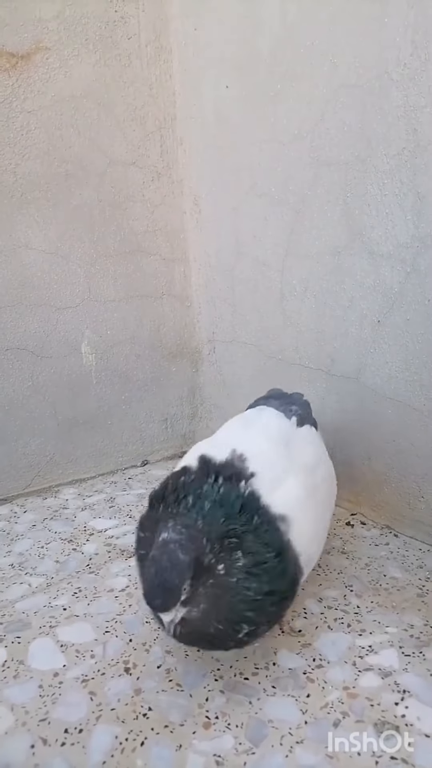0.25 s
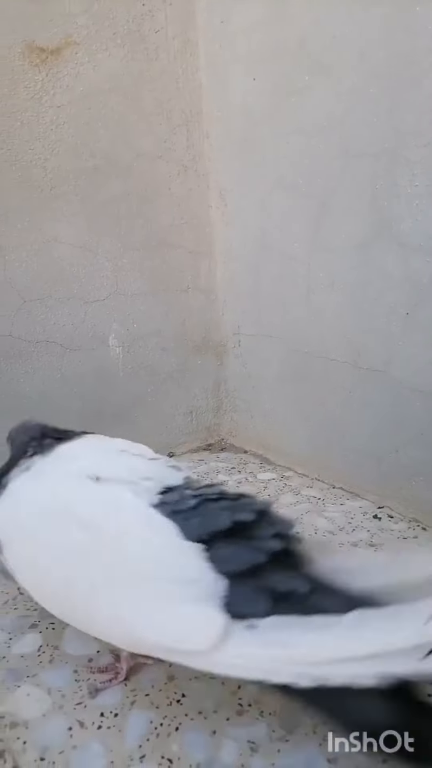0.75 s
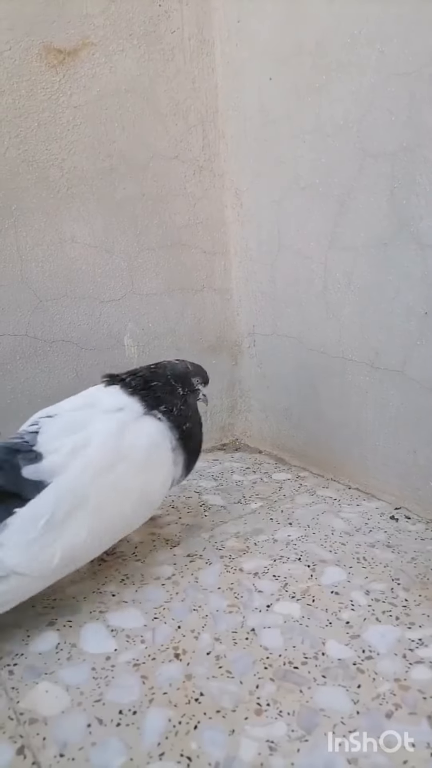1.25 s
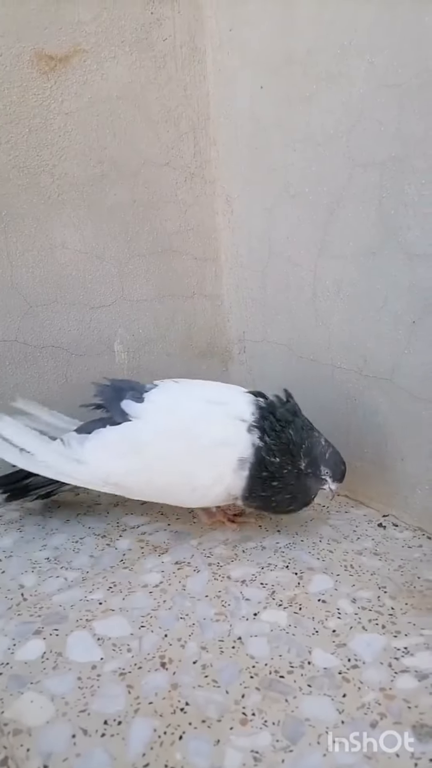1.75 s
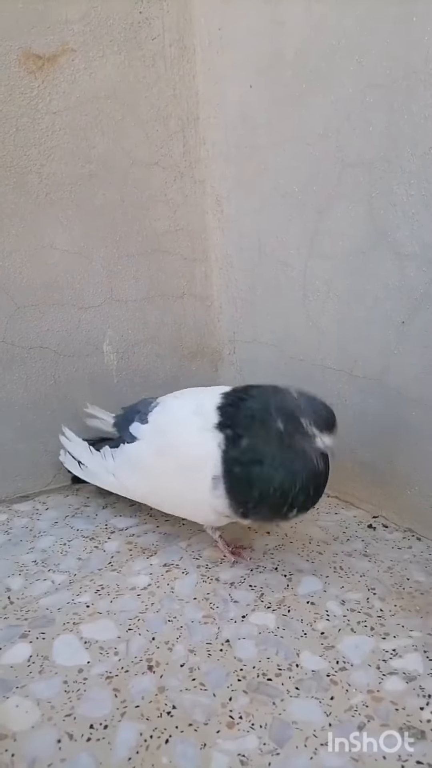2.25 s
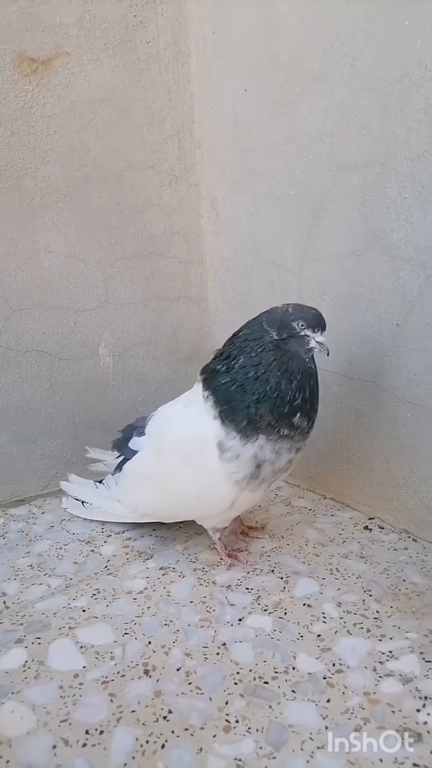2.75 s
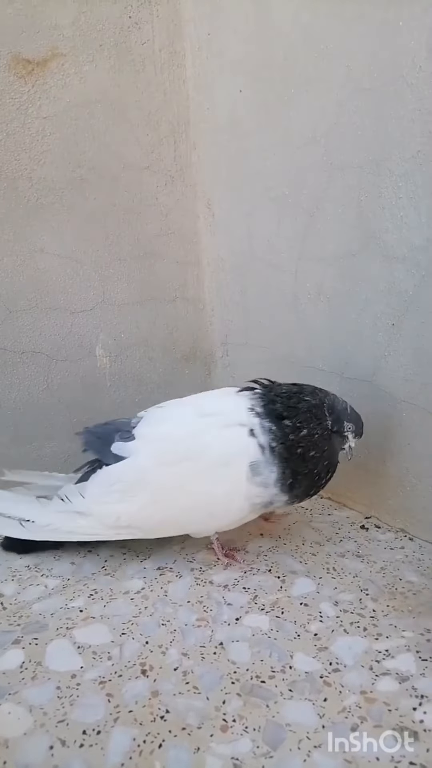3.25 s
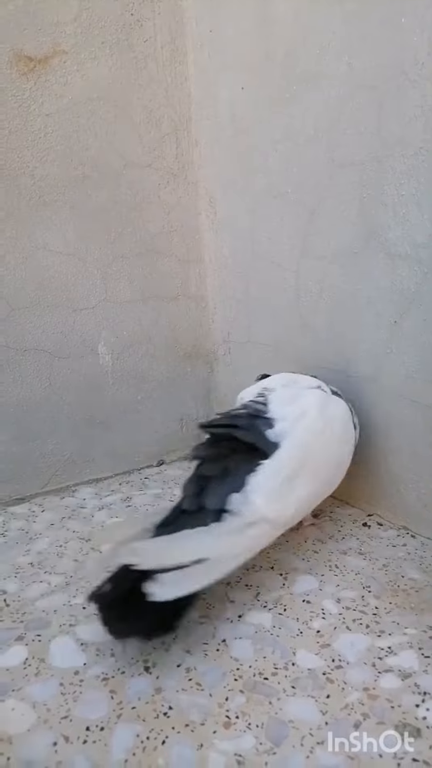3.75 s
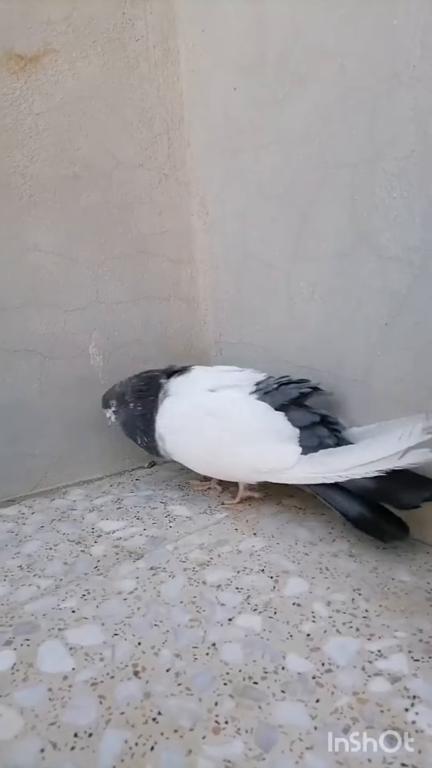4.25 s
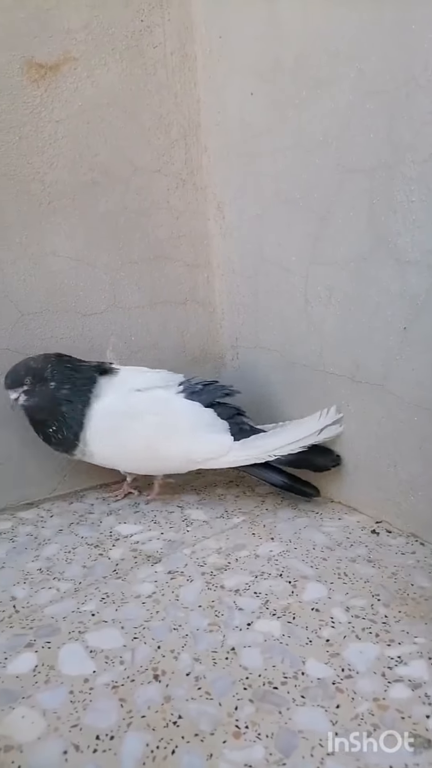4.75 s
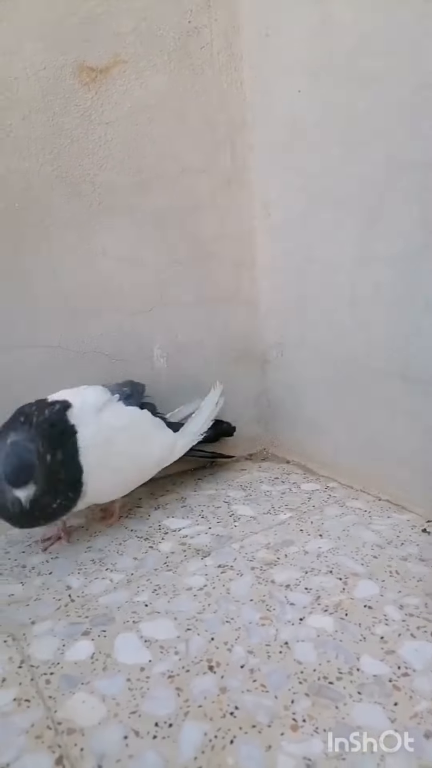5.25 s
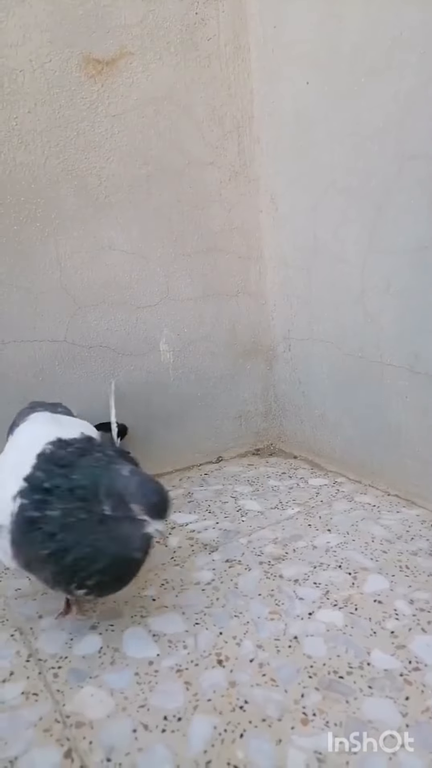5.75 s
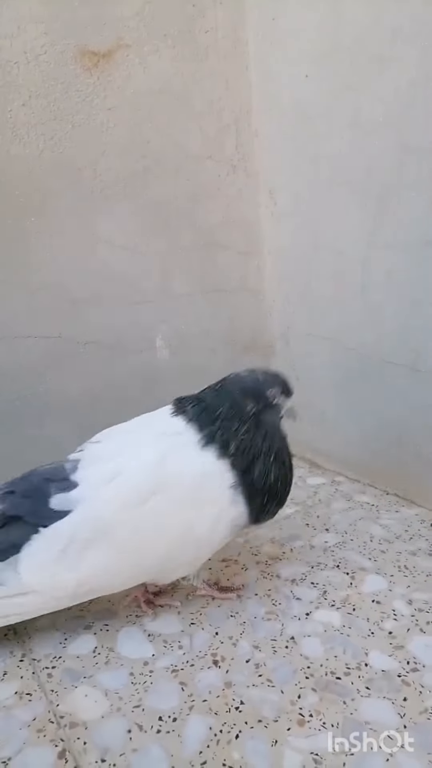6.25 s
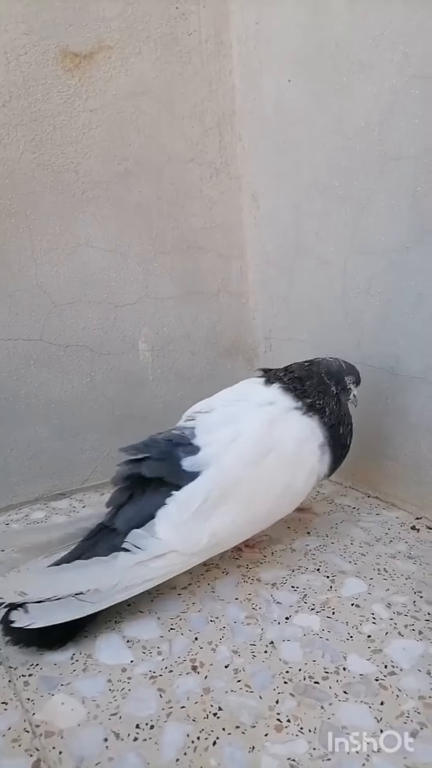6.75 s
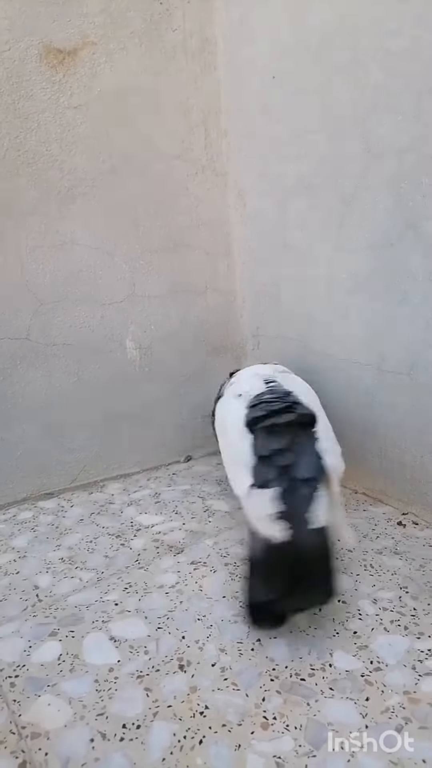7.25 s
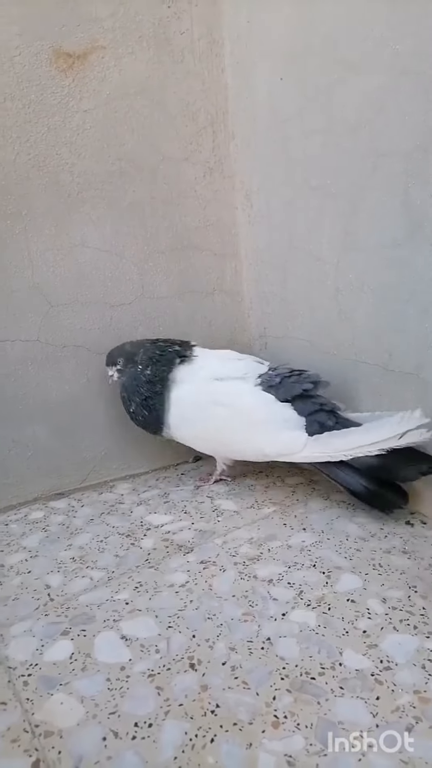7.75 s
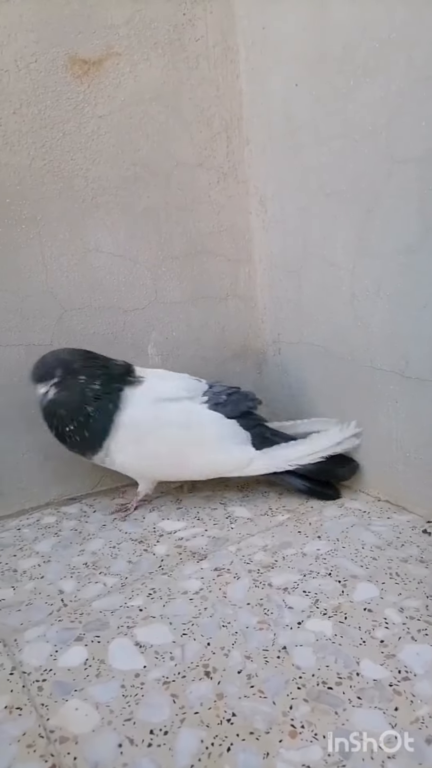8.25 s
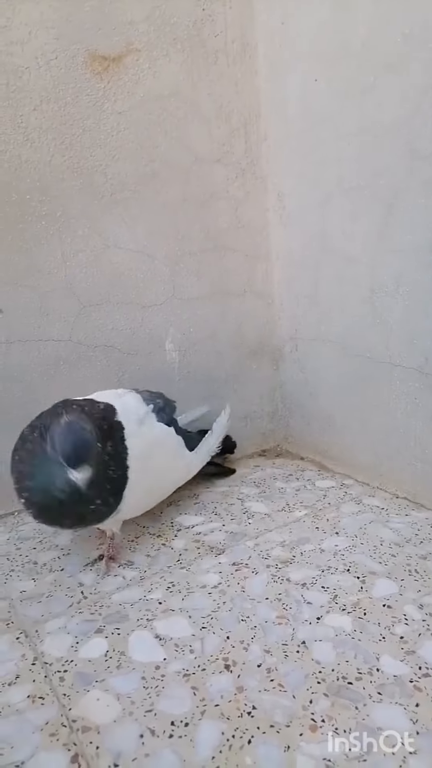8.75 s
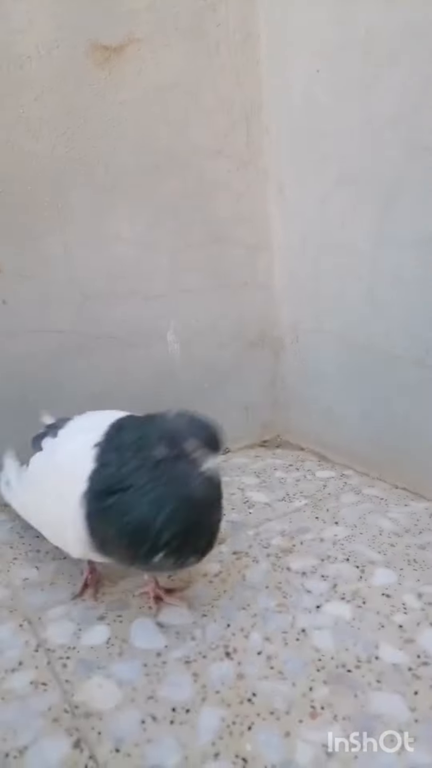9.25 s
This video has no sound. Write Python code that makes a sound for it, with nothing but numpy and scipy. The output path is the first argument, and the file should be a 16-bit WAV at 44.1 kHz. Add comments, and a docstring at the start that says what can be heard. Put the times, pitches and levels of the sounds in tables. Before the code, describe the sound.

A nearby pigeon gives low, stuttering, throaty coos and taps about on stone, with faint distant birds and a soft hiss.

```python
"""A pigeon coos and struts close by, on a stone floor in the corner of a room.
Pulses from its syrinx ring the inflated crop and the beak: coos stutter in short bursts over a soft hum
or glide, hold a rough growl, and may trail off in a low creak. Feet tap among papery brushes, and small
birds whistle far off. Airy hiss swells over low buffeting around the second coo, a brighter hiss lies
under the last two, and everything stops abruptly."""
import sys
import numpy as np
from scipy import signal
from scipy.fft import rfft, irfft
from scipy.io import wavfile
from scipy.ndimage import uniform_filter1d, minimum_filter1d

SR = 44100
rng = np.random.default_rng(int(sys.argv[2]) if len(sys.argv) > 2 else 0)


def int16_out(signal):
    """Quantize to a 16-bit WAV file."""
    q = np.round(np.clip(np.atleast_2d(signal).T, -1, 1) * 32767)
    wavfile.write(sys.argv[1], SR, q.astype(np.int16))


N = 418950
TIME = np.arange(N) / SR
OPEN_FROM_HZ = 480   # the beak counts as open from this resonance up


def pigeon():
    """The whole voice: growls, creaks, hums, one glide and stuttering bursts."""
    return growls() + creaks() + hums() + glide() + bursts()


# The growl that crowns each coo. Each row: start, hold and release in seconds, level in dB,
# pitch in Hz, beak resonance in Hz, roll depth 0-1, roughness 0-1.
GROWLS = [(0, 0.17, 0.27, -7.5, 183.6, 352, 0.2, 0.66), (2.181, .24, 0.12, -18.5, 188.5, 473, 0.45, .9),
          (7.089, .24, 0.0115, -18.5, 194.8, 550, 0.82, 0.61),
          (8.048, 0.24, 0.019, -20.5, 186.5, 552, 0.87, 0.5)]
def growls(roll_period_s=.091, first_crest_s=.018, sag_hz_per_s=20):
    """Sagging, throaty notes pushed out in rolls; each crest is higher, rougher and opens the beak."""
    out = np.zeros(N)
    for start, hold_s, release_s, db, hz, beak_hz, depth, rough in GROWLS:
        t, envelope = hold_and_release(hold_s, release_s)
        roll = depth * np.cos(2 * np.pi * (t - first_crest_s) / roll_period_s)
        pitch = (hz - sag_hz_per_s * t) * (1 + .065 * roll)
        gape = np.maximum(roll, 0) * np.sqrt(t / t[-1])
        lowest_hz = 225 if beak_hz < OPEN_FROM_HZ else hz   # a shut beak holds back the fundamental
        add(out, start, syrinx(pitch, from_db(db) * envelope, beak_hz, rough * (1 + .5 * roll),
                               soft_hz=900, lowest_hz=lowest_hz, gape=gape))
    return out


# Low creaks around the coos. Each row: start, hold and release in seconds, level in dB,
# first and last pitch in Hz, beak resonance in Hz.
CREAKS = [(1.318, 0.11, 0.042, -31, 96.3, 152.6, 435), (7.336, 0.065, 0.11, -33, 121.2, 126.2, 680),
          (8.285, 0.121, 0.08, -30.5, 103.1, 111.7, 755)]
def creaks():
    """A slack syrinx pulses slowly and roughly."""
    return held_notes(CREAKS, rough=.66, soft_hz=2500)


# Soft hums within the coos. Each row: start, hold and release in seconds, level in dB,
# first and last pitch in Hz, beak resonance in Hz.
HUMS = [(0, 0.32, 0.13, -22, 231.5, 200, 383), (1.436, 0.1, 0.013, -34, 161.5, 211, 390),
        (1.662, 0.12, 0.043, -28, 180.6, 200, 400), (2.167, 0.27, 0.023, -22.5, 246.6, 266.8, 440),
        (2.85, 0.032, 0.19, -37.5, 197.6, 172, 307), (6.91, 0.074, 0.012, -28, 260.7, 316, 590),
        (6.996, 0.083, 0.0088, -28, 201, 184, 604)]
def hums():
    """The other side of the syrinx closes gently, so the fundamental leads."""
    return held_notes(HUMS, rough=.6, soft_hz=197)


# The arch of the second coo. Each row: time in seconds, pitch in Hz, relative level in dB.
GLIDE = [(1.8, 260, -18), (1.817, 340, -15), (1.838, 409.4, -12), (1.856, 464.6, -24), (1.936, 582.4, -29),
         (1.977, 488, -28.5), (2.049, 480, -27.5), (2.137, 354, -12), (2.176, 250, -23.5)]
def glide(gain_db=1, fade_s=.006):
    """A nearly pure note that arches up and back down."""
    out = np.zeros(N)
    t = np.arange(GLIDE[0][0], GLIDE[-1][0], 1 / SR)
    pitch, level_db = curves_at(GLIDE, t)
    fade = np.clip(np.minimum(t - t[0], t[-1] - t) / fade_s, 0, 1)
    add(out, t[0], syrinx(pitch, from_db(level_db + gain_db) * fade, beak_hz=435, rough=.045))
    return out


# Throat bursts; the shortest are one-pulse clucks. Each row: start in seconds, peak in dB,
# length in seconds, beak resonance in Hz.
BURSTS = [(1.333, -20.5, .001, 664), (1.55, -13, 0.014, 453), (1.613, -12, 0.00079, 623),
          (1.712, -11, 0.015, 418), (1.779, -7.5, 0.02, 450), (1.867, -0.5, 0.0062, 430),
          (1.957, 3, 0.025, 450), (1.987, -10.5, 0.014, 426), (6.571, -19.5, .003, 586),
          (6.668, -20.5, .001, 595), (6.715, -18.5, .001, 607), (6.752, -16.5, .001, 563),
          (6.798, -13.5, .008, 556), (6.848, -17, .001, 553), (6.867, -9, .011, 588),
          (6.964, -7.5, 0.01, 595), (7.079, -7.5, 0.008, 574), (7.226, -5, .001, 564),
          (7.327, -10.5, .001, 600), (7.385, -16.5, .016, 735), (7.527, -16.5, 0.0042, 534),
          (7.572, -15.5, 0.01, 690), (7.624, -14.5, .001, 546), (7.67, -11.5, 0.0057, 684),
          (7.706, -10, 0.0012, 640), (7.748, -10, 0.0081, 530), (7.805, -7, 0.015, 578),
          (7.847, -9, 0.002, 576), (7.898, -4.5, 0.015, 603), (7.99, -5.5, 0.018, 598),
          (8.305, -17.5, .001, 910), (8.396, -17, .001, 924)]
def bursts(rebound_gap_s=.011, rebound_db=-2.5):
    """The stutter of a coo: short bursts rebound once, weaker and half as long."""
    out = np.zeros(N)
    for start, db, length, beak_hz in BURSTS:
        add(out, start, burst(db, length, beak_hz))
        if .002 < length < .015:   # the briefest clucks and the long bursts do not rebound
            add(out, start + length + rebound_gap_s, burst(db + rebound_db, length / 2, beak_hz))
    return out


def burst(peak_db, length, beak_hz, shut_pitch_hz=355.6):
    """A few pulses ring the throat, near the crop's pitch or an octave under an open beak's ring."""
    pitch = shut_pitch_hz if beak_hz < OPEN_FROM_HZ else beak_hz / 2
    delays = np.arange(0, length, 1 / pitch)
    arch = np.sin(np.pi * (delays + .5 / pitch) / (length + .5 / pitch))
    pulses = np.zeros(SR // 10)
    pulses[(delays * SR).astype(int)] = np.abs(arch) ** .82
    voice = throat(pulses, beak_hz)
    return from_db(peak_db) * voice / np.abs(voice).max()


def held_notes(rows, rough, soft_hz):
    """Quiet held notes, each sliding evenly in pitch."""
    out = np.zeros(N)
    for start, hold_s, release_s, db, first_hz, last_hz, beak_hz in rows:
        t, envelope = hold_and_release(hold_s, release_s)
        pitch = np.linspace(first_hz, last_hz, len(t))
        add(out, start, syrinx(pitch, from_db(db) * envelope, beak_hz, rough, soft_hz, lowest_hz=111))
    return out


def syrinx(pitch, envelope, beak_hz, rough, soft_hz=3000, lowest_hz=185, gape=0, shimmer_db=2.5):
    """Membranes pulse once a cycle into the throat; roughness unsettles pitch, timing and strength."""
    n = len(pitch)
    pitch = pitch * (1 + .05 * rough * wobble(n, 25, "low"))
    onsets = np.flatnonzero(np.diff(np.floor(np.cumsum(pitch) / SR), prepend=-1))
    lateness, strength = rng.standard_normal((SR, 2))[:len(onsets)].T
    jitter = .06 * lateness * SR * (rough / pitch)[onsets]
    onsets = np.clip(onsets + jitter, 0, n - 1).astype(int)
    pulses = np.zeros(n)
    pulses[onsets] = from_db(shimmer_db * np.mean(rough) * strength)
    pulses = butter(pulses, soft_hz, "low", order=1)
    # a gaping beak rings higher
    voice = (1 - gape) * throat(pulses, beak_hz) + gape * throat(pulses, beak_hz * 1.2)
    voice /= np.sqrt(uniform_filter1d(voice ** 2, size=500) + 1e-14)   # even out the level
    throb = 1 + .5 * rough * wobble(n, (20, 65), "band")   # the membranes throb unevenly
    return butter(voice * envelope * rms_one(throb), lowest_hz, "high", order=5)


# The beak rings higher and stronger as it opens. Each row: resonance in Hz, dB against the crop's ring.
BEAK_STRENGTH = [(385, -20.5), (450, -11.5), (530, -1), (720, 4)]
def throat(pulses, beak_hz, leak_db=-24):
    """The inflated crop and the beak ring; the neck muffles nearly everything above them."""
    beak_db = np.interp(beak_hz, *np.transpose(BEAK_STRENGTH))
    crop = resonance(pulses, hz=327, width_hz=270)
    beak = from_db(beak_db) * resonance(pulses, beak_hz, width_hz=180)
    ring = butter(crop - beak, 200, "high", order=3)
    leak = from_db(leak_db + beak_db / 2) * butter(ring, 1200, "low")
    return butter(ring, beak_hz * 1.037, "low", order=10) + leak


# Footfalls. Each row: start in seconds, relative level in dB.
STEPS = [(0.5, -30), (0.981, -29), (2.841, -17), (3.877, -24), (3.997, -29), (4.32, -30.5), (5.369, -31),
         (5.802, -30.5), (6.118, -33), (6.159, -33), (6.396, -26)]
# Their hollow midrange. Each row: frequency in Hz, gain in dB.
STEP_COLOUR = [(100, -12.5), (330, -5.5), (560, -4), (800, -8.5), (9000, -35.5)]
def footsteps(gain_db=-7):
    """Feet knock softly on the stone."""
    knocks = sum(from_db(db + gain_db) * strike(start, .00029, decay_s=.032) for start, db in STEPS)
    return knocks * noise(STEP_COLOUR)


# Light scuffs. Each row: start in seconds, relative level in dB.
SCUFFS = [(3.562, -32), (4.43, -41), (5.037, -38.5), (5.279, -37), (7.338, -34.5), (7.435, -29),
          (7.484, -32.5), (7.53, -28), (7.637, -32), (8.291, -31)]
def scuffs():
    """Feet graze the floor in short, airy scrapes."""
    scrapes = sum(from_db(db) * strike(start, .004, decay_s=.015) for start, db in SCUFFS)
    return scrapes * noise(AIR_COLOUR)


# Claw ticks. Each row: start in seconds, relative level in dB.
CLAWS = [(0.0185, -15), (0.214, -31), (0.2384, -27), (6.6866, -21), (6.783, -21), (8.021, -21.5),
         (8.055, -19), (8.118, -20.5), (8.151, -19)]
# Their bright edge. Each row: frequency in Hz, gain in dB.
CLAW_COLOUR = [(2000, -22), (5500, -14.5), (14000, -21)]
def claws(gain_db=-8):
    """Claws click sharply on the stone."""
    ticks = sum(from_db(db + gain_db) * strike(start, .0003, decay_s=.004) for start, db in CLAWS)
    return ticks * noise(CLAW_COLOUR)


# Papery brushes, then two clicks. Each row: start in seconds, relative level in dB, decay in seconds.
BRUSHES = [(1.548, -23.5, 0.013), (1.746, -12.5, 0.013), (1.872, -17.5, 0.016), (2.121, -23.5, 0.025),
           (2.254, -20.5, 0.017), (2.382, -18, 0.016), (2.494, -23, 0.056), (2.832, -22.5, 0.022),
           (2.664, -24, 0.018), (7.106, -27.5, 0.005), (7.203, -19, 0.003)]
# Their midrange tone. Each row: frequency in Hz, gain in dB.
BRUSH_COLOUR = [(100, 3.5), (1000, 11.5), (3000, 0.5), (7000, 1.5), (13000, -17)]
def brushes_and_clicks():
    """Puffs of noise: papery brushes, and two short midrange clicks on a growl's crests."""
    puffs = sum(from_db(db) * strike(start, .004, decay_s) for start, db, decay_s in BRUSHES)
    return puffs * noise(BRUSH_COLOUR)


# Clear chirps. Each row: start and length in seconds, first and last pitch in Hz, level in dB.
CHIRPS = [(0, 0.13, 4310, 4100, -47), (0.264, 0.27, 3447, 3194, -48.5), (.28, 0.28, 2310, 2190, -60),
          (0.581, .1, 4270, 4190, -47.5), (0.815, 0.21, 3440, 3210, -50), (0.724, 0.16, 7660, 6550, -47),
          (5.733, 0.079, 3000, 4270, -48.5), (6.138, 0.059, 4300, 4820, -45),
          (6.345, 0.14, 3540, 3310, -45.5)]
# Flurries. Each row: start and end in seconds, centre in Hz, spread in octaves, level in dB.
TWITTERS = [(3.952, 4.653, 2840, 0.81, -61.5), (5.597, 6.462, 4420, 0.61, -56)]
def small_birds():
    """A few clear chirps among flurries of wavering twitter."""
    out = np.zeros(N)
    for start, *chirp in CHIRPS:
        add(out, start, whistle(*chirp, waver=.005))
    for flurry in TWITTERS:
        for start, *chirp in twitter(*flurry):
            add(out, start, whistle(*chirp, waver=.018))
    return out


def twitter(start_s, end_s, centre_hz, octaves, db, per_s=45, call_s=.045):
    """Short random calls, rows as in CHIRPS; a flurry grows busier towards its end."""
    when, length, pitch, slide, loud = rng.random((int(per_s * (end_s - start_s)), 5)).T
    starts = start_s + (end_s - start_s) * np.sqrt(when)
    first_hz = centre_hz * 2 ** (octaves * (pitch - .5))
    last_hz = first_hz * 2 ** (octaves * (slide - .5) / 2)
    return np.transpose([starts, call_s * (.5 + length), first_hz, last_hz, db + 10 * (loud - .5)])


def whistle(length, first_hz, last_hz, db, waver):
    """A thin whistle that slides quickly and settles."""
    along = np.linspace(0, 1, int(length * SR))
    unsteady = 1 + waver * wobble(len(along), 100, "low", span=SR // 2)
    hz = (last_hz + (first_hz - last_hz) * (1 - along) ** 2) * unsteady
    return from_db(db) * np.sin(np.pi * np.sqrt(along)) * np.sin(2 * np.pi * np.cumsum(hz) / SR)


# Swells of airy hiss. Each row: start and end in seconds, first and last treble level in dB,
# lows against treble in dB.
SWELLS = [(0, 0.345, -40.5, -67.5, 1.5), (0.607, 1.313, -54.5, -41.5, -8.5), (1.594, 2.87, -36.5, -40, -2)]
# The tone of the air, shared by the scuffs. Each row: frequency in Hz, gain in dB.
AIR_COLOUR = [(30, -8), (400, -8), (1730, -18), (5700, -15), (13000, -27)]
def air(split_hz=2400, low_floor_db=-57.5, treble_floor_db=-54.5, scratch_db=-6):
    """Airy noise swells and sinks over a steady floor, its treble specked with scratches."""
    treble_swells = sum(swell(*span) for *span, _ in SWELLS)
    low_swells = sum(from_db(low_db) * swell(*span) for *span, low_db in SWELLS)
    specks = np.hypot(1, from_db(scratch_db) * scratches())
    low = butter(noise(AIR_COLOUR, (900, 2000)), split_hz, "low")
    treble = butter(noise(AIR_COLOUR, (split_hz, SR / 2)), split_hz, "high")
    low *= np.hypot(from_db(low_floor_db), low_swells)
    treble *= np.hypot(from_db(treble_floor_db), treble_swells)
    return low + specks * treble


def swell(start_s, end_s, first_db, last_db, rise_s=.026, fall_s=.24):
    """Envelope that comes in quickly, slopes evenly in dB and fades."""
    edges = np.clip(np.minimum((TIME - start_s) / rise_s, (end_s - TIME) / fall_s) + .5, 0, 1)
    return edges * from_db(np.interp(TIME, [start_s, end_s], [first_db, last_db]))


def scratches(per_s=36, spread_db=7.3):
    """Envelope of light, separate scratches at random moments."""
    sizes = from_db(spread_db * np.minimum(rng.exponential(1, N), 2))
    flicks = (rng.random(N) < per_s / SR) * sizes
    return signal.fftconvolve(flicks, strike(0, .002, decay_s=.011)[:SR])[:N]


# Low buffeting around the second coo. Each row: time in seconds, pitch in Hz, level in dB.
BUFFET = [(1.62, 24, -28.5), (1.761, 35, -25), (2.201, 58, -33), (2.63, 74, -32.5), (3.1, 94, -51)]
def buffeting(period_s=.0622):
    """Low throbs that rise in pitch and fade."""
    out = np.zeros(N)
    t = np.arange(0, period_s * 1.2, 1 / SR)
    for moment in np.arange(BUFFET[0][0], BUFFET[-1][0], period_s):
        hz, db = curves_at(BUFFET, moment)
        throb = np.sin(2 * np.pi * (hz * t + rng.random())) * np.hanning(len(t))
        add(out, moment - period_s / 2, from_db(db) * throb)
    return out


# Brighter hiss under the last two coos. Each row: time in seconds, treble level in dB.
HISS = [(6.55, -56), (6.9, -50.5), (7.15, -45), (8.4, -42), (8.55, -51.5)]
# Its full mids and long, flat top. Each row: frequency in Hz, gain in dB.
HISS_COLOUR = [(100, 11), (600, 18), (1300, 3.5), (10000, -1), (15000, -2.5)]
def bright_hiss(flutter_db=1.9, rumble_db=-52.5):
    """A fluttering hiss builds over a low rumble."""
    level_db, = curves_at(HISS, TIME)
    hiss = from_db(level_db) * noise(HISS_COLOUR, (2400, SR / 2), top_hz=15700)
    flutter = from_db(flutter_db * wobble(N, (10, 45), "band", span=N))
    rumble = rms_one(resonance(rng.standard_normal(N), hz=45, width_hz=7))
    return hiss * flutter + from_db(rumble_db) * rumble


def room(x, wet_db, t60):
    """Direct sound and a diffuse tail from the bare walls."""
    t = TIME[:SR]
    tail = rng.standard_normal(SR) * from_db(-60 * t / t60) * (t > .006)
    return x + from_db(wet_db) * signal.fftconvolve(x, tail / np.linalg.norm(tail))[:N]


def hold_and_release(hold_s, release_s, attack_s=.0034):
    """Times and envelope of a note with a quick attack, a hold and a release."""
    t = np.arange(0, hold_s + release_s, 1 / SR)
    return t, np.minimum(t / attack_s, 1) * np.clip(1 - (t - hold_s) / release_s, 0, 1) ** 2


def strike(start_s, rise_s, decay_s):
    """Envelope of a contact that rises and dies away."""
    age = np.clip(TIME - start_s, 0, 1)
    return (1 - np.exp(-age / rise_s)) * np.exp(-age / decay_s)


def noise(colour, unit_band=(0, SR / 2), top_hz=13900):
    """Coloured noise, scaled so that the part inside unit_band has rms 1."""
    hz = np.arange(N // 2 + 1) * SR / N
    points_hz, db = np.transpose(colour)
    gain = from_db(np.interp(np.log(hz + 1), np.log(points_hz), db))
    bins = rfft(rng.standard_normal(N)) * gain * (hz < top_hz) * (hz > 20)
    inside = (hz > unit_band[0]) * (hz < unit_band[1])
    return irfft(bins, N) / np.std(irfft(bins * inside, N))


def wobble(n, hz, kind, span=SR):
    """Random motion with rms 1: the last n samples of a span of filtered noise."""
    return rms_one(butter(rng.standard_normal(span), hz, kind)[-n:])


def resonance(x, hz, width_hz):
    """Two-pole resonance with gain 1 at its peak."""
    radius = np.exp(-np.pi * width_hz / SR)
    feedback = [1, -2 * radius * np.cos(2 * np.pi * hz / SR), radius ** 2]
    return signal.lfilter(np.array([1, 0, -1]) * (1 - radius ** 2) / 2, feedback, x)


def butter(x, hz, kind, order=2):
    return signal.sosfilt(signal.butter(order, hz, kind, fs=SR, output="sos"), x)


def curves_at(rows, t):
    """The columns that follow a table's time column, read at the times t."""
    times, *columns = np.transpose(rows)
    return [np.interp(t, times, column) for column in columns]


def add(out, start_s, sound):
    at = max(round(start_s * SR), 0)
    out[at:at + len(sound)] += sound[:N - at]


def from_db(db):
    return 10 ** (np.asarray(db) / 20)


def rms_one(x):
    return x / np.sqrt(np.mean(x ** 2) + 1e-20)


def scene(hiss_from_s=6.52):
    """The pigeon is near, the small birds far and washed out; soft air gives way to brighter hiss."""
    near = room(pigeon() + footsteps() + scuffs() + claws() + brushes_and_clicks(), wet_db=-21, t60=.28)
    far = room(small_birds(), wet_db=1.5, t60=.2)
    background = np.where(TIME < hiss_from_s, air() + buffeting(), bright_hiss())
    return (near + far + background)[None]


def record(dry, ceiling=.77, end_s=8.56, cutoff_hz=15700):
    """A limiter holds the loudest bursts, the sound stops dead, the top is cut."""
    gain = np.minimum(1, ceiling / (np.abs(dry) + 1e-9))
    limited = dry * uniform_filter1d(minimum_filter1d(gain, size=400), size=400)
    high_cut = signal.ellip(10, .1, 90, cutoff_hz, fs=SR, output="sos")
    return signal.sosfilt(high_cut, limited * (TIME < end_s))


dry = scene()
out = record(dry)
int16_out(out)
```